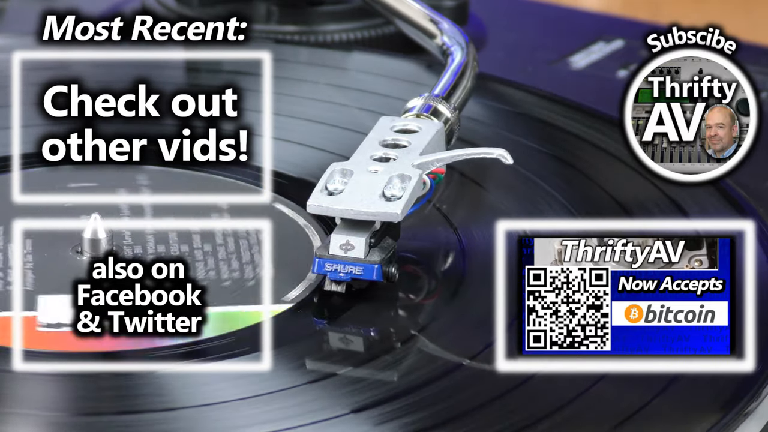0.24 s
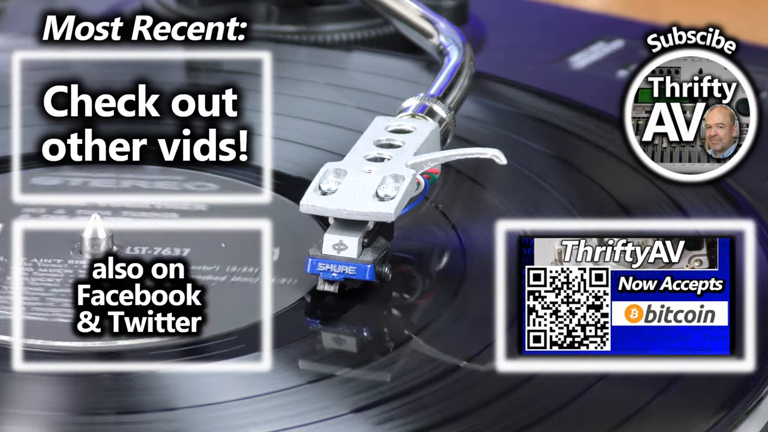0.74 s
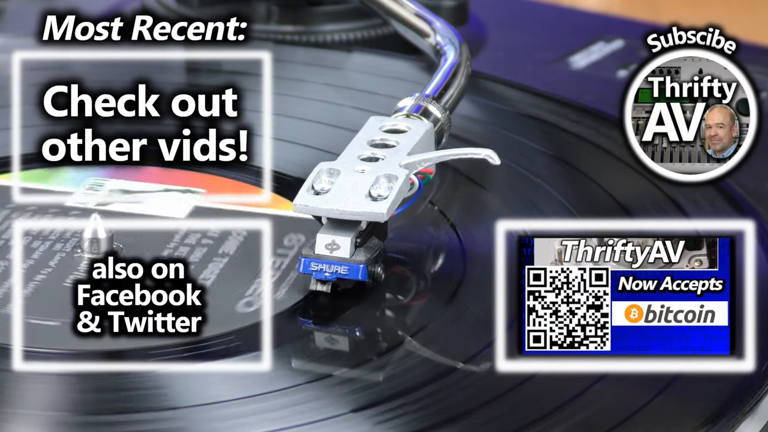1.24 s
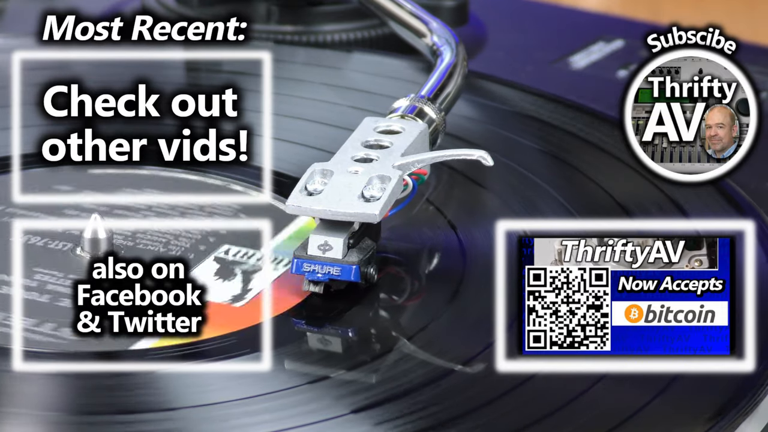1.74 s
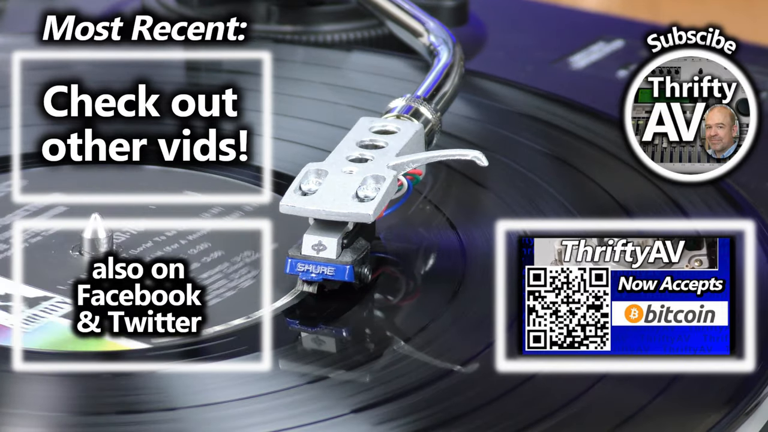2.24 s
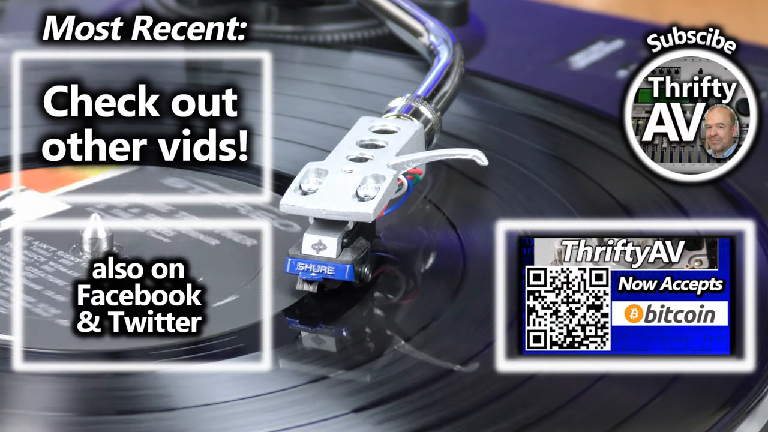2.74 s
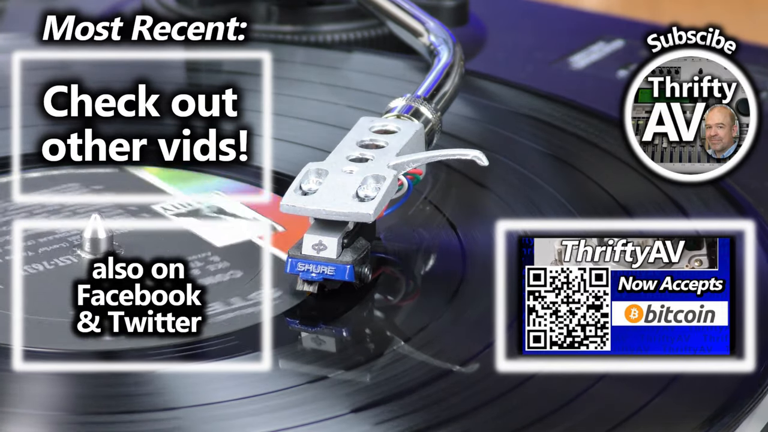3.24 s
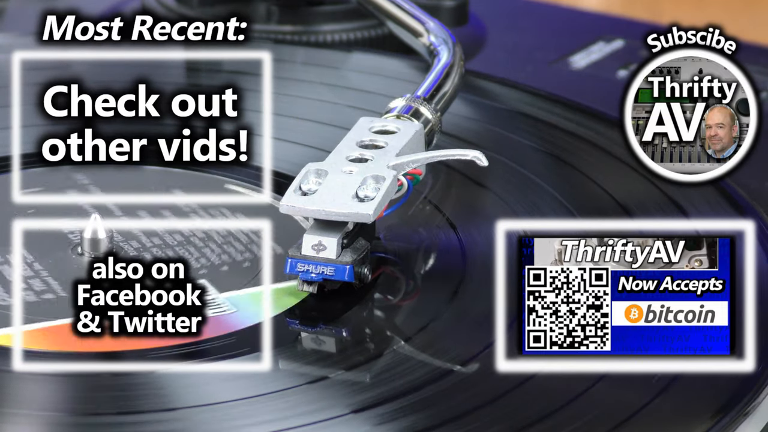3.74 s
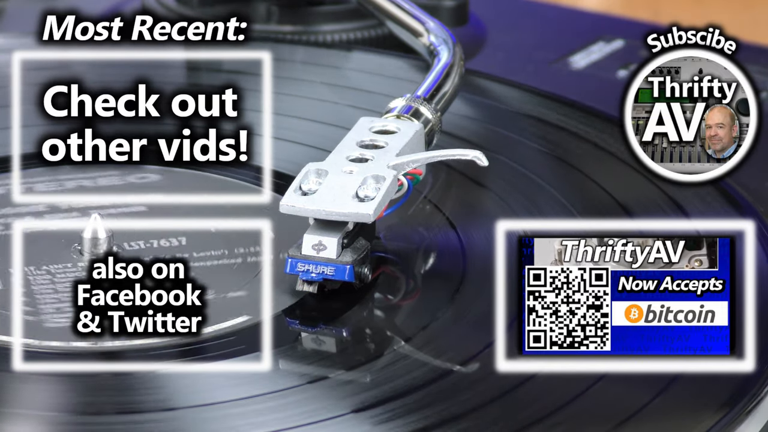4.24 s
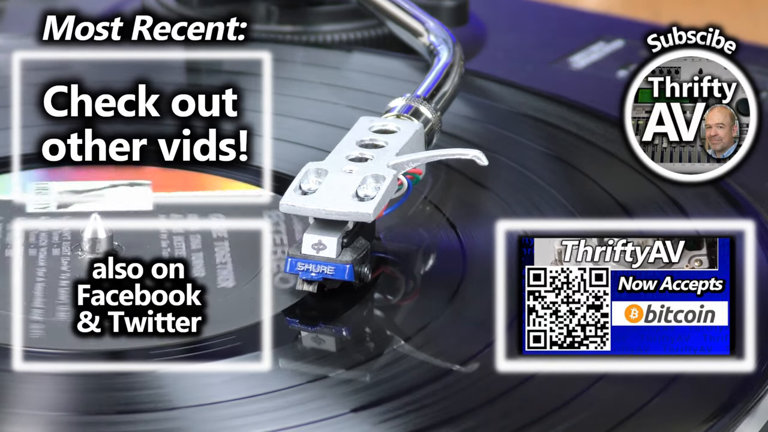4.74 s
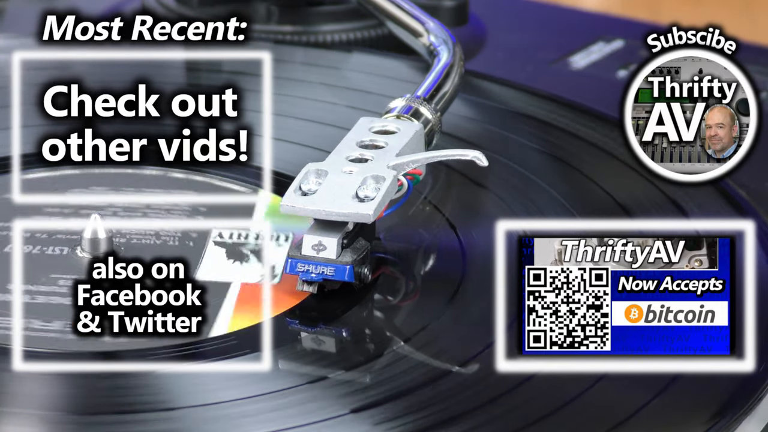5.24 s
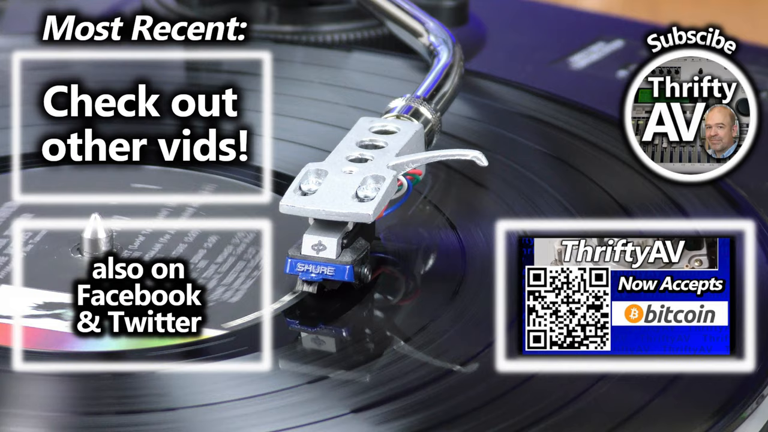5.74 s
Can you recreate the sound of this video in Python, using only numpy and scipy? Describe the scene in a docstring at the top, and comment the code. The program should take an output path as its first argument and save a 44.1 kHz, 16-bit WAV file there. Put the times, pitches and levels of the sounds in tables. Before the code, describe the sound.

Scattered pops and ticks from a spinning vinyl record play through a loudspeaker in a small room, fading over a faint low rumble.

```python
"""A stylus rides the lead-out of a vinyl record, drops into the locked groove and circles as the volume
fades. Dust and scratches pop, bumps thump, scuffs rasp and the worn groove crackles; flaws in the locked
groove come round again a turn later. They play from a loudspeaker in a small room, with a stereo
microphone far enough off to catch as much room as direct sound. Behind them lie the groove's hiss,
swishing once a turn in the locked groove, and the rumble and hum of the turntable motor."""
import sys
import numpy as np
from scipy import signal
from scipy.fft import rfft, irfft
from scipy.io import wavfile
from scipy.ndimage import uniform_filter1d

SR = 44100
rng = np.random.default_rng(int(sys.argv[2]) if len(sys.argv) > 2 else 0)


def to_wav(s):
    """Save 16-bit WAV."""
    ch = np.atleast_2d(s).T  # columns
    pcm = np.round(np.clip(ch, -1, 1) * 32767)  # PCM
    wavfile.write(sys.argv[1], SR, pcm.astype(np.int16))


N = 264600
TIME = np.arange(N) / SR

# pops from dust and scratches, a few of them heard again a turn later: start_s, strength_db, sharpness_hz
SCRATCHES = [(.0672, -12, 11100), (.1101, -10, 8550), (.1393, -7.5, 9400), (.1738, -8.5, 3930),
             (.1976, -6.5, 7200), (.2115, 3.5, 2550), (.2551, 1, 4630), (.269, 2, 3800), (.2895, -5, 3250),
             (.3844, 4.5, 3380), (.3974, 1.5, 3720), (.4455, -3, 5300), (.4537, -8, 7960),
             (.6278, -2.8, 4800), (.7293, 5.5, 4170), (.76, -5, 3800), (.818, 2.5, 2450),
             (.9155, -4.5, 4520), (1.0757, -2.25, 6060), (1.0853, 8, 2700), (1.1831, -8, 4000),
             (1.2329, -9.5, 9600), (1.2898, -8, 6800), (1.332, -4, 6060), (1.4766, -9, 5100),
             (1.5166, -4.5, 4000), (1.5287, 2, 2820), (1.6038, 5.5, 3660), (1.6513, -1, 3460),
             (1.7164, 2.8, 2880), (1.7803, -4.5, 4000), (1.81, 1, 2940), (1.8593, -1.8, 4230),
             (1.9005, 0.5, 4900), (2.0001, 8, 3060), (2.032, -4, 2440), (2.0945, 1.7, 3200),
             (2.1581, -6, 2840), (2.1867, -3.5, 2700), (2.2445, 0, 3500), (2.2549, 4.1, 3300),
             (2.4822, -7.5, 2900), (2.5111, -5, 5500), (2.54, -7, 6360), (2.6255, 1.5, 3140),
             (2.7328, 5.5, 4170), (2.7782, -3.5, 5500), (2.8012, 6.5, 5060), (2.9802, .5, 4270),
             (3.0672, -1, 4860), (3.1382, 0.5, 2740), (3.4611, -7, 5400), (3.5015, -3, 6360),
             (3.7485, -3, 5330), (3.81, -7, 2620), (3.8554, 4.5, 2600), (3.8617, -5, 5500),
             (3.9562, 0, 3570), (3.9657, -4, 3100), (4.0719, -11, 5000), (4.159, -4.5, 3300),
             (4.275, -1.8, 2500), (4.3525, -9, 3800), (4.4986, -6.5, 2590), (4.5787, -4, 3600),
             (4.6016, -2, 3200), (4.7806, -1, 1680), (4.8953, -4, 2980)]
# bumps in the vinyl: start_s, strength_db, sharpness_hz
VINYL_BUMPS = [(.2108, -1.5, 600), (1.8097, -4, 488), (1.8997, 7.5, 675), (2.7368, 10.5, 323),
               (3.6612, 3.5, 219), (3.6745, 4, 141), (4.9378, -8, 533)]
# scuffed patches: start_s, strength_db, sharpness_hz, length_s
SCUFFED_PATCHES = [(.272, -16, 1780, 0.033), (1.08, -12, 3520, 0.011), (2.023, -8.5, 1360, 0.014),
                   (2.068, -15, 1280, 0.04), (2.308, -16.5, 1040, 0.073), (2.725, -6, 3950, 0.015),
                   (3.856, -16.5, 1600, 0.0079), (4.49, -19.5, 1910, 0.089)]
# wear along the lead-out, heard as hiss and crackle: time_s, relative_level_db
GROOVE_WEAR = [(0.0, -64), (0.32, -61), (0.47, -68.5), (0.67, -68), (0.97, -68), (1.12, -59), (1.3, -72),
               (1.52, -68), (1.72, -63), (1.95, -61.5), (2.57, -63.5), (2.7, -63.5)]
# colour of the groove's hiss: frequency_hz, relative_density_db
HISS_COLOUR = [(500, 6), (1200, 5.5), (1700, -7.5), (2300, -3), (2800, -7.5), (3600, 1), (4600, 1.5),
               (5300, 0.5), (6200, -5), (7800, -4.5), (10000, -5.5), (12000, -15), (15500, -27)]
# the amplifier's volume fade: time_s, gain_db
VOLUME_FADE = [(4.2, 1.5), (4.7, -2), (5.76, -3.5), (6, -20.5)]
# amplifier bass lift and loudspeaker: frequency_hz, gain_db
SPEAKER_COLOUR = [(25, -43), (60, -1.5), (110, 17), (200, 13), (550, 0.5), (820, -5.5), (1230, 5),
                  (1650, -14), (2850, -14.5), (4600, -8), (6000, -14), (9800, -14.5), (12000, -25),
                  (15500, -34)]
# cone resonances, added to the plain response: pitch_hz, width_hz, gain
CONE_RESONANCES = [(1160, 210, 0.1), (1360, 280, 0.27), (2210, 213, 1), (3510, 330, 0.5), (4720, 110, 0.99)]
# reflections off near surfaces: delay_s, left_gain, right_gain
REFLECTIONS = [(.00103, -0.52, -0.55), (.00345, -0.47, -0.41)]
# direct sound at the right capsule: frequency_hz, gain_db
RIGHT_CAPSULE = [(100, 0.5), (500, -0.5), (1200, -4.5), (4000, -4.5), (9000, -1.5), (14000, 5.5)]
# standing waves of the room: pitch_hz, level_over_direct_db, t60_s
STANDING_WAVES = [(105.6, 7, 0.041), (143.5, -5, 0.19), (244, 3, 0.071), (291, 3, 0.044), (368, 7, 0.069)]
# diffuse echo of the room: frequency_hz, energy_over_direct_db, t60_s
ROOM_TAIL = [(58.5, -1.5, 0.17), (195, -1, .36), (280, 3.5, 0.32), (456, 1.5, 0.39), (880, 7, 0.37),
             (1004, 3, 0.24), (1297, -3.5, 0.32), (2095, 2.5, 0.38), (1970, -5, 0.28), (4800, -2.5, 0.26),
             (11400, 4.5, 0.49)]
# likeness of diffuse sound at the two capsules: frequency_hz, correlation
CAPSULE_LIKENESS = [(100, 0.97), (250, 0.95), (500, 0.78), (1200, 0.56), (3000, 0.54), (8000, 0.012)]
# colour of the turntable's rumble: frequency_hz, relative_density_db
RUMBLE_COLOUR = [(20, -11), (42, -51), (56, -2), (78, -8), (125, 5.5), (190, -5), (290, -2.5), (450, -7),
                 (750, -16.5), (1250, -14.5), (1800, -30), (4000, -46.5)]
# rise and fall of the rumble: time_s, relative_level_db
RUMBLE_SWING = [(0.0, -54.5), (1.3, -56), (2.07, -53), (2.87, -59), (6.0, -65.5)]
# motor tones at average rumble: pitch_hz, level_db
MOTOR_TONES = [(59.2, -66), (118.4, -73.5)]

TURN_S, LOCK_S, SETTLE_S = 1.8004, 2.71, .1   # one turn; reaching the locked groove; settling into it
SWISH_DB, SWISH_SAG_DB_PER_S, SWISH_DROP_DB = -60.5, 3.5, 10   # on the relative scale of GROOVE_WEAR
SWISH_ATTACK_S, SWISH_HOLD_S, SWISH_RELEASE_S = 0.014, 1, 0.24


def stylus(kicks, sharpness_hz):
    """Each kick lifts the stylus and lets it settle; the cartridge senses its speed."""
    pole = np.exp(-2 * np.pi * sharpness_hz / SR)
    lift = signal.sosfilt(np.tile([1 - pole, 0, 0, 1, -pole, 0], (3, 1)), kicks + 1e-18)
    return np.diff(lift, prepend=0) * SR / (2 * np.pi * sharpness_hz)


def flaws(rows, push_cycles, size=2048):
    """Each flaw kicks the stylus once; a wide one pushes for longer, which hollows out the treble."""
    out = np.zeros(N + size)
    for start_s, strength_db, sharpness_hz in rows:
        start = round(start_s * SR)
        push_samples = max(push_cycles * SR / sharpness_hz, 1)
        push = np.clip(push_samples - np.arange(size), 0, 1)
        out[start:start + size] += from_db(strength_db) * stylus(push / push.sum(), sharpness_hz)
    return out[:N]


def locked_groove(rows):
    """Flaws met after the stylus settles in the locked groove come round again one turn later."""
    returns = [(start_s + TURN_S, *rest) for start_s, *rest in rows if start_s > LOCK_S + SETTLE_S]
    return [row for row in list(rows) + returns if row[0] < N / SR]


def dust(per_s=8.6, strength_db=-10.5, spread_db=2.5, sharpness_hz=5070, spread_octaves=0.82, count=64):
    """Faint specks lie at random along the lead-out: start_s, strength_db, sharpness_hz."""
    starts_s = np.cumsum(rng.exponential(1, count)) / per_s
    return [(start_s, strength_db + spread_db * size, sharpness_hz * 2 ** (spread_octaves * edge))
            for start_s, (size, edge) in zip(starts_s, rng.standard_normal((count, 2)))
            if start_s < LOCK_S]


def scuffs(grains_per_s, spread_db):
    """The stylus skids through each scuff in a swelling, fading run of small kicks."""
    out = np.zeros(N)
    grains = (rng.random(N) < grains_per_s / SR) * rng.choice([-1, 1], N)
    kicks = grains * from_db(spread_db * rng.standard_normal(N))
    for start_s, strength_db, sharpness_hz, length_s in locked_groove(SCUFFED_PATCHES):
        progress = np.clip((TIME - start_s) / length_s, 0, 1)
        swell = np.sqrt(np.abs(np.sin(np.pi * progress)))
        out += from_db(strength_db) * stylus(kicks * swell, sharpness_hz)
    return out


def crackle(strength_db, per_band_per_s, spread_db, sharpness_hz):
    """Fine dust ticks under the stylus in three bands, from dull to bright."""
    out = 0
    for band_hz in (sharpness_hz / 2, sharpness_hz, sharpness_hz * 2):
        hits = rng.random(N) < per_band_per_s / SR
        sizes = from_db(strength_db + spread_db * np.minimum(rng.exponential(1, N), 3))
        out = out + stylus(hits * sizes * rng.choice([-1, 1], N), band_hz)
    return out


def wall_rub_db():
    """Rubbing follows the lead-out's wear, then swishes each locked turn: starts fast, sags, lets go."""
    into_turn_s = (TIME - LOCK_S) % TURN_S
    release = np.clip((into_turn_s - SWISH_HOLD_S) / SWISH_RELEASE_S, 0, 1)
    swish_db = SWISH_DB - SWISH_SAG_DB_PER_S * into_turn_s - SWISH_DROP_DB * release
    rub_db = np.where(TIME > LOCK_S, swish_db, over_time(GROOVE_WEAR))
    return uniform_filter1d(rub_db, round(SWISH_ATTACK_S * SR))


def loudspeaker(x, crossover_hz, crossover_q):
    """The speaker colours the sound, its cone rings, and its crossover lets the treble out first."""
    coloured = signal.fftconvolve(x, causal_filter(SPEAKER_COLOUR))[:N]
    rings = sum(gain * signal.lfilter(*signal.iirpeak(hz, hz / width_hz, fs=SR), coloured)
                for hz, width_hz, gain in CONE_RESONANCES)
    _, poles = signal.iirpeak(crossover_hz, crossover_q, fs=SR)
    return signal.lfilter(poles[::-1], poles, coloured + rings)   # all-pass


def direct_path(size, gain_db, right_lag_s):
    """The straight sound and its first reflections reach the microphone's two capsules."""
    hz = np.fft.rfftfreq(size, 1 / SR)
    left, right = 1 + sum(np.outer(gains, np.exp(-2j * np.pi * hz * round(delay_s * SR) / SR))
                          for delay_s, *gains in REFLECTIONS)
    right = right * rfft(causal_filter(RIGHT_CAPSULE), size) * np.exp(-2j * np.pi * hz * right_lag_s)
    return from_db(gain_db) * irfft([left, right], size) * (TIME[:size] < .02)


def standing_waves(size, start_s):
    """Low room modes boom on after every pulse."""
    age_s = np.maximum(TIME[:size] - start_s, 0)
    out = 0
    for pitch_hz, level_db, t60_s in STANDING_WAVES:
        amplitude = from_db(level_db) * 2 * np.log(1000) / (t60_s * SR)
        out = out + amplitude * from_db(-60 * age_s / t60_s) * np.sin(2 * np.pi * pitch_hz * age_s)
    return out


def reverb(size, gap_s, build_s, bands=10):
    """Diffuse echoes swell after a short gap and die away, each octave at its own rate."""
    age_s, hz = TIME[:size], np.fft.rfftfreq(size, 1 / SR)
    spectrum = rfft(diffuse_noise(ROOM_TAIL, size))
    swell = 1 - np.exp(-np.maximum(age_s - gap_s, 0) / build_s)
    centres_hz = np.geomspace(30, 15000, bands)
    out = 0
    for centre_hz, pick in zip(centres_hz, np.eye(bands)):
        band = irfft(spectrum * np.interp(hz, centres_hz, pick), size)
        decay = swell * from_db(-60 * age_s / at_hz(ROOM_TAIL, centre_hz, column=2))
        out = out + band * decay / np.sqrt(np.sum(decay ** 2))
    return out


def room(x, size=24000):
    """The small room from where the microphone stands: direct sound, standing waves, diffuse echo."""
    direct = direct_path(size, gain_db=0.5, right_lag_s=.000025)
    boom = standing_waves(size, start_s=0.0027)
    tail = reverb(size, gap_s=0.00099, build_s=0.00095)
    return signal.fftconvolve(x[None], direct + boom + tail, axes=1)[:, :N]


def groove_hiss(rub_db, gain_db, floor_db):
    """The groove wall hisses with a slight flutter; the amplifier's own hiss stays as a floor."""
    level_db = np.maximum(rub_db + gain_db, floor_db)
    flutter_db = .6 * drift(40)
    return from_db(level_db + flutter_db) * rms_one(diffuse_noise(HISS_COLOUR, N))


def hum(waver_db, wander_rad):
    """The motor's low tones waver a little in level and phase."""
    out = 0
    for pitch_hz, level_db in MOTOR_TONES:
        amplitude = np.sqrt(2) * from_db(level_db + waver_db * drift(6.3))
        out = out + amplitude * np.sin(2 * np.pi * pitch_hz * TIME + wander_rad * drift(3.6))
    return out


def motor(rumble_gain_db, hum_share):
    """The turntable rumbles, and its hum follows a share of the rumble's swing in level."""
    rumble_db = over_time(RUMBLE_SWING)
    rumble = from_db(rumble_db + rumble_gain_db) * rms_one(diffuse_noise(RUMBLE_COLOUR, N))
    hum_swing = from_db(hum_share * (rumble_db - rumble_db.mean()))
    return rumble + hum_swing * hum(waver_db=1.0, wander_rad=0.4)


def diffuse_noise(colour, size):
    """Coloured noise, alike at both capsules in the bass and unrelated in the treble."""
    hz = np.fft.rfftfreq(size, 1 / SR)
    mid, side = rfft(rng.standard_normal((2, size)))
    alike = at_hz(CAPSULE_LIKENESS, hz)
    stereo = np.sqrt((1 + alike) / 2) * mid + np.sqrt((1 - alike) / 2) * side * [[1], [-1]]
    return irfft(stereo * from_db(at_hz(colour, hz)), size)


def causal_filter(colour, size=4096):
    """Minimum-phase impulse response for a table of frequency_hz, gain_db."""
    gain = from_db(at_hz(colour, np.fft.rfftfreq(size, 1 / SR)))
    cepstrum = irfft(np.log(gain))
    cepstrum[1:size // 2] *= 2
    cepstrum[size // 2 + 1:] = 0
    return irfft(np.exp(rfft(cepstrum)))


def drift(rate_hz):
    """A slow random wander with an RMS of one."""
    knots = rng.standard_normal(1024)
    return rms_one(np.interp(TIME * rate_hz, np.arange(len(knots)), knots))


def at_hz(points, hz, column=1):
    """Reads one column of a table on a log-frequency axis."""
    table = np.array(points)
    return np.interp(np.log(np.maximum(hz, 1)), np.log(table[:, 0]), table[:, column])


def over_time(curve):
    """Reads a table of time_s, value at every sample."""
    return np.interp(TIME, *np.transpose(curve))


def from_db(db):
    return 10 ** (np.asarray(db) / 20)


def rms_one(x):
    return x / np.sqrt(np.mean(x ** 2) + 1e-20)


def scene():
    """Pops, thumps, rasps and crackle cross the room from the speaker, over groove hiss and the motor."""
    rub_db, volume_db = wall_rub_db(), over_time(VOLUME_FADE)
    pops = flaws(locked_groove(SCRATCHES) + dust(), push_cycles=0.12)
    thumps = flaws(locked_groove(VINYL_BUMPS), push_cycles=0.04)
    rasps = scuffs(grains_per_s=1000, spread_db=3.0)
    ticks = crackle(rub_db + 43, per_band_per_s=11, spread_db=2.84, sharpness_hz=6650)
    amplified = from_db(volume_db) * (pops + thumps + rasps + ticks)
    at_microphone = room(loudspeaker(amplified, crossover_hz=3200, crossover_q=1.54))
    hiss = groove_hiss(rub_db + volume_db, gain_db=1, floor_db=-76)
    return at_microphone + hiss + motor(rumble_gain_db=-1.5, hum_share=0.65)


def record(dry):
    """The top is cut steeply above 15.6 kHz."""
    return signal.sosfilt(signal.ellip(10, .2, 80, 15600, fs=SR, output="sos"), dry)


dry = scene()
out = record(dry)
to_wav(out)
```